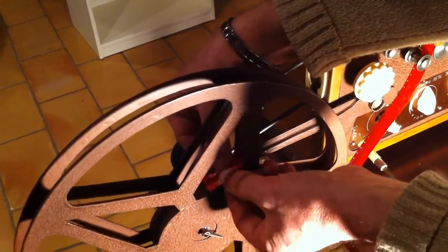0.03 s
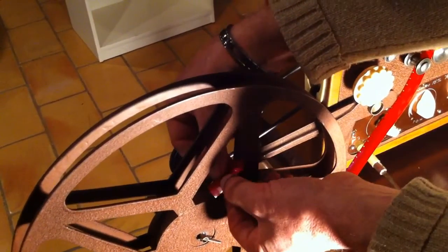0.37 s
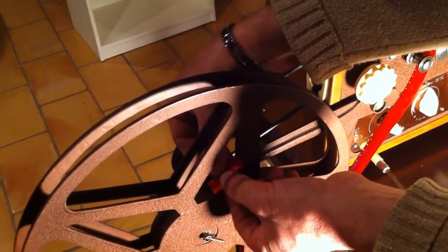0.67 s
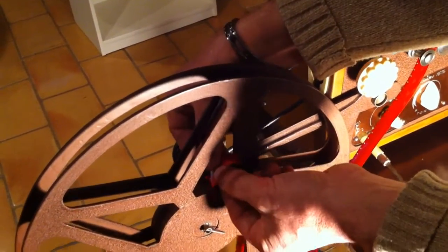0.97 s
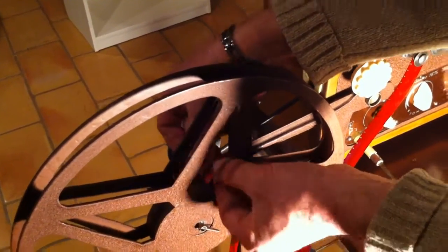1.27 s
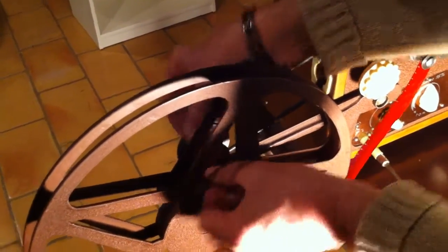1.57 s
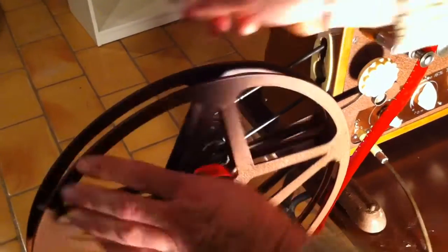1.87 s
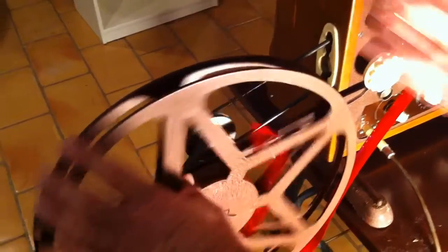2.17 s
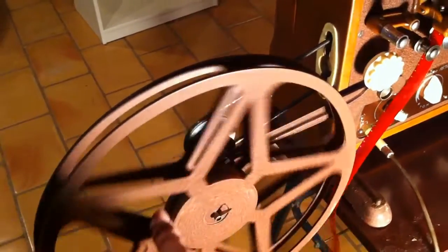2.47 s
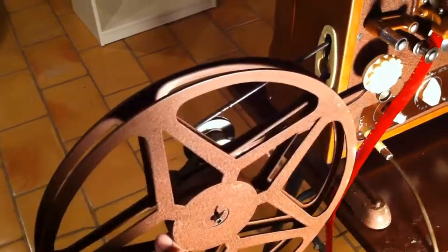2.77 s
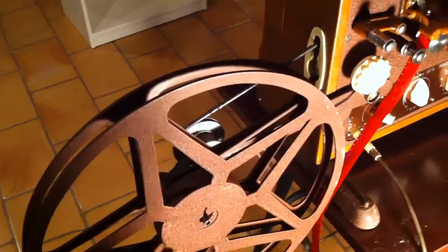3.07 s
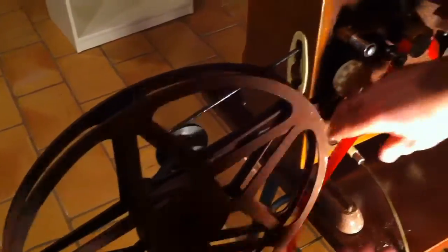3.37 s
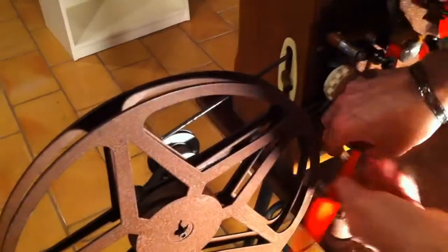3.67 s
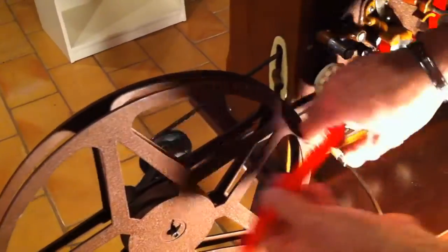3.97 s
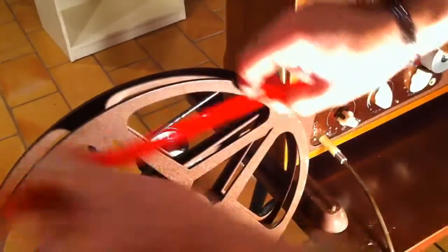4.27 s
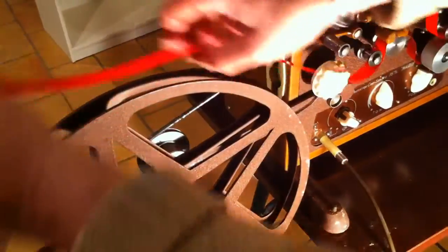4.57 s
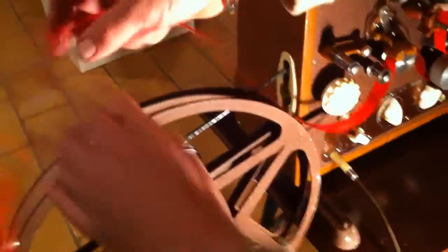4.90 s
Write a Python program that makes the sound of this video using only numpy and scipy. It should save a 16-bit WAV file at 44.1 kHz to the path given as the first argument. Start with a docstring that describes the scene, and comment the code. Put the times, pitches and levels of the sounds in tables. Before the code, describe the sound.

Hands work film onto a metal projector reel, close to the microphone in a quiet room. For the first two seconds there are only faint scattered ticks, soft dull knocks and light scratchy rubbing of fingers at the hub. From about 2.2 to 2.5 seconds the reel is spun: its bearing rumbles softly and the film end clatters on the spokes in a quick run of sharp, bright clicks with a brief metallic ring. After a short lull, at about 3.5 seconds, the film is tugged from its guides with a juddering rattle and several knocks that shake the arm. A click follows at 3.8 and a knock at 4 seconds, then film slides through the fingers with a fine, soft hiss until about 4.7. Around 5 seconds come a few more sharp snaps. Short room reflections, still air and a faint electrical hum lie underneath.

```python
"""A quiet room, close to a projector: hands fasten film to a metal reel.
Fingers rub and knock at the hub. The reel is spun, its bearing rumbles and the film end clatters
on the spokes, ringing the metal. The film is then tugged from its guides, shaking the arm,
and hisses through the fingers. Rubbing is a stream of tiny slips; snaps and knocks are noise bursts.
Short room reflections, still air and a faint mains hum lie under it."""
import sys
import numpy as np
from scipy import signal
from scipy.fft import rfft, irfft
from scipy.io import wavfile
from scipy.ndimage import uniform_filter1d

SR = 44100
rng = np.random.default_rng(int(sys.argv[2]) if len(sys.argv) > 2 else 0)


def file_out(sig):
    """Save sig as 16-bit WAV at sys.argv[1]."""
    # one column per channel
    cols = np.atleast_2d(sig).T
    # limit, then scale
    lim = np.clip(cols, -1, 1)
    pcm = np.round(lim * 32767).astype(np.int16)
    wavfile.write(sys.argv[1], SR, pcm)


N = 226535
TIME_S = np.arange(N) / SR
# metal reel modes: freq_hz, weight_db, t60_s
REEL_MODES = [(2900, -11, 0.065), (4870, -17, .16), (6100, -8, 0.081), (6366, -3, 0.15), (6550, -8, 0.13),
              (6630, -10, 0.13), (7365, -4.5, 0.097), (7630, 2, 0.034), (8125, -21.5, 0.1),
              (9220, 3, 0.071), (10170, 3, 0.042), (11300, -5, .07), (11630, -6, 0.064), (13300, -14, .05)]


def snaps(gain_db=6, tick_db=-3, focus_db=3, size=12000):
    """Film and fingers snap on the reel: a tick and a chatter of contacts ring the metal."""
    # snaps: start_s, relative_db, bright_hz, chatter_t60_s, ring_db
    events = [(0.1276, -38.5, 6250, 0.041, -6), (0.3456, -44.5, 6160, 0.035, -8),
              (0.391, -27, 7400, 0.04, -4.5), (0.8779, -35.5, 3600, 0.022, -21),
              (0.9413, -39.5, 3180, 0.027, -18), (1.065, -45, 6110, 0.035, -14),
              (1.1722, -42.5, 3190, 0.038, -15), (1.276, -34, 5920, 0.035, -12),
              (1.474, -34, 6090, 0.029, -8), (1.704, -31, 5430, 0.059, -7),
              (1.8582, -38.5, 2840, 0.028, -10), (2.1011, -39, 2730, 0.04, -2),
              (2.1909, -14.5, 6530, 0.044, -5.5), (2.2304, -23.5, 6470, 0.038, -1),
              (2.3191, -18.5, 6620, 0.023, -0.5), (2.3454, -27, 13200, 0.035, -8),
              (2.3504, -26, 13500, 0.038, -8), (2.3634, -29, 6120, 0.035, -6),
              (2.3794, -38, 6120, 0.035, -12), (2.4004, -12, 6650, 0.036, -5),
              (2.4254, -17, 6660, 0.035, 0), (2.4673, -24, 6440, 0.035, 1.5),
              (2.4844, -25, 6410, 0.043, -4), (2.6514, -42, 7180, 0.038, -8),
              (2.8404, -29.5, 6400, 0.038, -6), (3.4516, -29.5, 1900, 0.04, 1),
              (3.5653, -20.5, 6370, 0.038, 1), (3.6925, -28, 1730, 0.025, -6.5),
              (3.7933, -22, 9300, 0.057, -2.5), (4.0004, -27, 1550, 0.03, -0.5),
              (4.7835, -30.5, 6400, 0.027, -10), (4.9886, -16, 3040, 0.021, -4),
              (4.9964, -19, 6510, 0.038, -5), (5.0444, -12.5, 9000, 0.035, -1),
              (5.1033, -38, 7660, 0.035, -8)]
    # snap spectrum: freq_hz, gain_db
    spectrum = [(180, -39), (300, -12), (1360, -11), (3030, -7.5), (5160, -12), (6520, -1), (8640, -11.5),
                (14700, -11), (16000, -24)]
    out, t = np.zeros(N), np.arange(size) / SR
    grid_hz = np.geomspace(200, 16000, 24)
    for start_s, relative_db, bright_hz, t60_s, ring_db in events:
        chatter = unit_energy(rng.standard_normal(size) * amp(-60 * t / t60_s))
        chatter[0] += amp(tick_db)
        rolloff_db = focus_db * np.minimum(np.log2(grid_hz / bright_hz) ** 2, 2)
        shape_db = log_interp(spectrum, grid_hz) - rolloff_db
        snap = unit_energy(colour(chatter, np.c_[grid_hz, shape_db]))
        metal = unit_energy(signal.fftconvolve(snap, ring(REEL_MODES, spread_db=15))[:size])
        add(out, start_s, amp(relative_db + gain_db) * (snap + amp(ring_db) * metal))
    return out


def knocks(gain_db=14, skirt_db=-17, far_db=-42, size=6000):
    """Soft blows of hands and parts, each rattling a damped part around one pitch."""
    # dull knocks: start_s, relative_db, pitch_hz, t60_s
    events = [(0.87, -45.5, 875, 0.045), (0.876, -42, 640, 0.033), (1.045, -44.5, 490, 0.045),
              (1.325, -35, 517, 0.035), (1.335, -35.5, 282, 0.035), (2.186, -41.5, 2440, 0.035),
              (2.447, -39.5, 248, 0.045), (2.651, -54, 258, 0.035), (3.192, -53, 278, 0.038),
              (3.45, -37.5, 1110, 0.043), (3.469, -41, 1030, 0.035), (3.487, -32, 940, 0.045),
              (3.565, -30, 1040, 0.032), (3.582, -27, 1080, 0.032), (3.596, -31.5, 1000, 0.047),
              (4.005, -32.5, 1680, 0.048), (4.005, -37.5, 1550, 0.049), (4.115, -48.5, 1750, 0.035),
              (4.623, -45, 1280, 0.032), (5.021, -50, 517, 0.04)]
    out, t = np.zeros(N), np.arange(size) / SR
    for start_s, relative_db, hz, t60_s in events:
        blow = unit_energy(rng.standard_normal(size) * amp(-60 * t / t60_s))
        blow[0] += 1
        body = [(hz / 5, far_db), (hz / 2, skirt_db), (hz / 1.04, 0), (hz * 1.05, 0),
                (hz * 2, skirt_db), (hz * 7, far_db), (hz * 14, -65)]
        add(out, start_s, amp(relative_db + gain_db) * unit_energy(colour(blow, body)))
    return out


def rubbing(gain_db=-4, ring_db=-9):
    """Fingers and film edges scratch over the reel, which rings faintly."""
    # one envelope per rub: time_s, relative_db
    rubs = [
        [(0.85, -83), (0.882, -43), (0.91, -70), (1.058, -62.5), (1.066, -47.5), (1.1, -78), (1.252, -63),
         (1.274, -50), (1.392, -65), (1.522, -43), (1.542, -58), (1.65, -66)],
        [(1.85, -60.5), (2.18, -66.5), (2.19, -41), (2.312, -60), (2.318, -51), (2.388, -58), (2.404, -45),
         (2.416, -58), (2.43, -46), (2.456, -61), (2.484, -47), (2.528, -66), (2.75, -72.5)],
        [(4.8, -62.5), (4.978, -56), (4.99, -45), (5.036, -63), (5.042, -50), (5.13, -67)],
    ]
    # scratch spectrum: freq_hz, gain_db
    spectrum = [(290, -51), (500, -18.5), (919, -17), (2770, -3.5), (4470, -7.5), (6420, -2.5),
                (7000, -12.5), (7420, -14), (14500, -13), (16000, -14)]
    slips = friction(slips_per_s=3500, spread_db=3.5, clump_db=5.0) * sum(envelope(rub) for rub in rubs)
    scratch = unit_rms(colour(slips, spectrum))
    metal = unit_rms(signal.fftconvolve(slips, ring(REEL_MODES, spread_db=3.5))[:N])
    return amp(gain_db) * np.std(slips) * (scratch + amp(ring_db) * metal)


def tug(gain_db=-5, ring_db=-2):
    """Film judders out of the guides and shakes the arm."""
    # pull envelope: time_s, relative_db
    pull = [(3.43, -85), (3.45, -48.5), (3.496, -48.5), (3.526, -47), (3.586, -34.5), (3.618, -45.5),
            (3.786, -59), (3.792, -58.5), (3.92, -70)]
    # judder spectrum: freq_hz, gain_db
    spectrum = [(41, -63), (70, -33), (124, -13), (233, -12.5), (385, -8), (834, -20.5), (1020, -8),
                (1100, -17), (1930, -11), (4380, -21), (6160, -16.5), (13600, -28.5), (16000, -48)]
    # arm and guide modes: freq_hz, weight_db, t60_s
    arm_modes = [(303, -13.5, 0.22), (387.4, -9, 0.18), (926, -11, 0.075), (1023, -1, 0.15),
                 (1138, -11, 0.092), (1290, -13, .13), (1330, -16.5, .15), (1510, -10, 0.12),
                 (2034, -16, .15), (3180, -16, .07), (3480, -9, 0.11), (6280, -6.5, 0.028)]
    slips = friction(slips_per_s=2500, spread_db=2.5, clump_db=1.0) * envelope(pull)
    judder = unit_rms(colour(slips, spectrum))
    arm = unit_rms(signal.fftconvolve(slips, ring(arm_modes, spread_db=2.0))[:N])
    return amp(gain_db) * np.std(slips) * (judder + amp(ring_db) * arm)


def slide(gain_db=0.5):
    """Smooth film on skin: dense slips merge into a fine, high hiss."""
    # slide envelope: time_s, relative_db
    stroke = [(3.9, -86), (3.926, -59.5), (3.986, -70), (4.004, -46.5), (4.03, -69), (4.078, -55),
              (4.104, -62.5), (4.156, -54), (4.268, -64), (4.484, -56.5), (4.65, -74.5), (4.66, -65)]
    # hiss spectrum: freq_hz, gain_db
    spectrum = [(290, -37), (500, -7), (553, -2.5), (708, -8), (974, -7), (5240, -5.5), (6510, -1),
                (10700, -3.5), (13300, -1.5), (16000, -8.5)]
    slips = friction(slips_per_s=14000, spread_db=3.5, clump_db=1.5)
    return amp(gain_db) * envelope(stroke) * unit_rms(colour(slips, spectrum))


def spindle(gain_db=-0.5):
    """The turning reel rumbles in its bearing."""
    # spin envelope: time_s, relative_db
    spin = [(1.95, -77), (2.206, -60), (2.384, -82), (2.46, -57.5), (2.498, -67.5), (2.744, -72),
            (2.78, -83), (2.994, -86), (3.0, -89)]
    # rumble spectrum: freq_hz, gain_db
    spectrum = [(25, -15), (45, -14), (61, -1.5), (80, -26), (125, -15), (170, -4), (330, -0.5), (600, -11),
                (1300, -8.5), (2500, -32)]
    slips = friction(slips_per_s=900, spread_db=2.5, clump_db=2.0)
    return amp(gain_db) * envelope(spin) * unit_rms(colour(slips, spectrum))


def room(x, build_s=0.0076, size=26000):
    """Reflections off tiles and walls build up, then die away band by band."""
    # room decay: freq_hz, t60_s
    decay = [(150, 0.88), (600, 0.49), (2500, 0.56), (7000, .4), (15000, 0.28)]
    taps = rng.standard_normal(size) * (rng.random(size) < .15)
    taps *= 1 - np.exp(-np.arange(size) / SR / build_s)
    hz, t, bands = signal.stft(taps, SR, nperseg=256)
    t60_s = log_interp(decay, hz)[:, None]
    tail = signal.istft(bands * amp(-60 * t / t60_s), SR, nperseg=256)[1]
    return signal.fftconvolve(x, unit_energy(tail))[:N]


def air(level_db=-65.18):
    """Still air with microphone hiss."""
    # noise floor spectrum: freq_hz, gain_db
    spectrum = [(12, -51), (20, -13), (27, -33.5), (168, -13.5), (204, 1.5), (228, -17), (293, -7),
                (357, -17.5), (472, -15.5), (642, -19.5), (923, -19), (1090, -20), (1480, -17.5),
                (2140, -21), (16000, -25.5)]
    return amp(level_db) * unit_rms(colour(rng.standard_normal(N), spectrum, size=16384))


def mains_hum(waver=0.19, wander_rad=0.28):
    """Faint hum, each tone wavering in level and phase."""
    # hum tones: freq_hz, level_db
    tones = [(100, -100), (199.8, -73.5), (268, -85.5), (399.5, -83)]
    out = np.zeros(N)
    for hz, level_db in tones:
        swell = 1 + waver * drift(6)
        phase_rad = 2 * np.pi * hz * TIME_S + wander_rad * drift(6.4)
        out += amp(level_db) * unit_rms(swell * np.sin(phase_rad))
    return out


def friction(slips_per_s, spread_db, clump_db):
    """Tiny slips of uneven size that come in clumps; rms 1."""
    sizes = amp(spread_db * np.minimum(rng.exponential(1, N), 4)) * rng.choice([-1, 1], N)
    slipping = rng.random(N) < slips_per_s / SR
    return unit_rms(sizes * slipping * amp(clump_db * drift(70)))


def ring(modes, spread_db, size=12000):
    """Impulse response of decaying modes; random weights stand for the place of contact."""
    t = np.arange(size) / SR
    weights = amp(spread_db * rng.standard_normal(len(modes))) * rng.choice([-1, 1], len(modes))
    out = np.zeros(size)
    for weight, (hz, db, t60_s) in zip(weights, modes):
        mode = amp(-60 * t / t60_s) * np.sin(2 * np.pi * hz * t)
        out += weight * amp(db) * unit_energy(mode)
    return unit_energy(out)


def drift(cutoff_hz):
    """Smooth random wander; rms 1."""
    passband = np.fft.rfftfreq(N, 1 / SR) < cutoff_hz
    return unit_rms(irfft(rfft(rng.standard_normal(N)) * passband, N))


def colour(x, spectrum, size=4096):
    """Minimum-phase filter from (freq_hz, gain_db) rows."""
    hz = abs(np.fft.fftfreq(size, 1 / SR))
    log_gain = np.log(amp(log_interp(spectrum, hz)))
    taps = np.fft.ifft(np.exp(np.conj(signal.hilbert(log_gain)))).real
    return signal.fftconvolve(x, taps[:size // 2])[:len(x)]


def envelope(rows):
    """Smoothed gain from (time_s, relative_db) rows, silent outside them."""
    time_s, db = np.transpose(rows)
    return uniform_filter1d(amp(np.interp(TIME_S, time_s, db, left=-140, right=-140)), size=200)


def log_interp(rows, hz):
    """Table lookup on a log-frequency axis."""
    freq_hz, value = np.transpose(rows)
    return np.interp(np.log(hz + 1), np.log(freq_hz + 1), value)


def add(mix, start_s, sound):
    part = mix[round(start_s * SR):][:len(sound)]
    part += sound[:len(part)]


def amp(db):
    return 10 ** (np.asarray(db) / 20)


def unit_rms(x):
    return x / np.sqrt(np.mean(x ** 2) + 1e-20)


def unit_energy(x):
    return x / np.sqrt(np.sum(x ** 2) + 1e-20)


def scene(impact_send_db=-9, friction_send_db=-8):
    """Handling, its reflections and the background; mono."""
    impacts = snaps() + knocks()
    rubs = rubbing() + tug() + slide() + spindle()
    reflections = room(amp(impact_send_db) * impacts + amp(friction_send_db) * rubs)
    return (impacts + rubs + reflections + air() + mains_hum())[None]


def record(dry, cutoff_hz=16000):
    """Low-pass band limit."""
    lowpass = signal.firwin(255, cutoff_hz, window=("kaiser", 7), fs=SR)
    return signal.oaconvolve(dry, lowpass[None], "same")


dry = scene()
out = record(dry)
file_out(out)
```